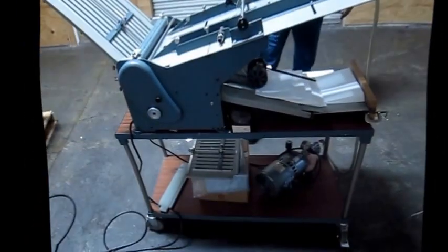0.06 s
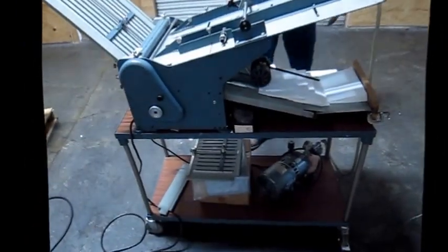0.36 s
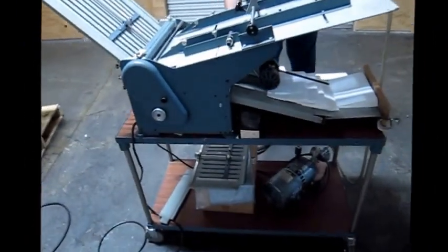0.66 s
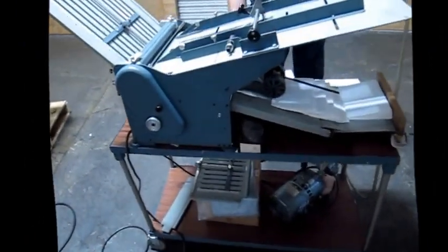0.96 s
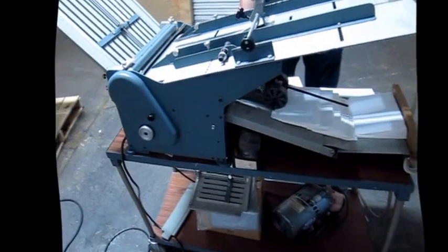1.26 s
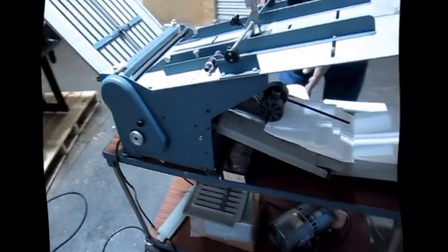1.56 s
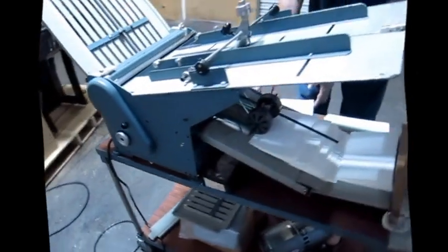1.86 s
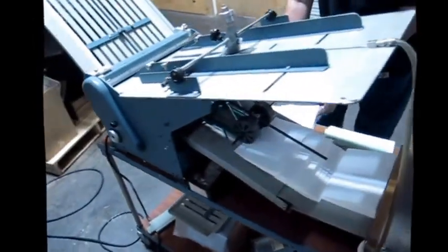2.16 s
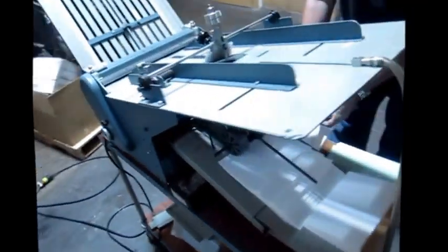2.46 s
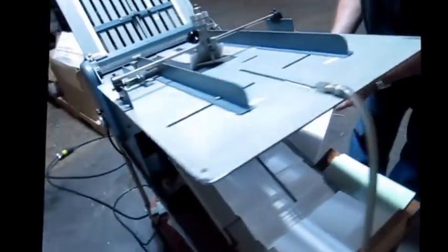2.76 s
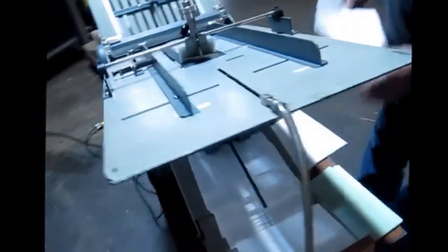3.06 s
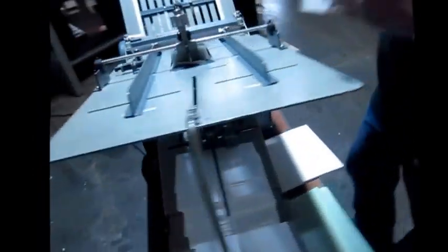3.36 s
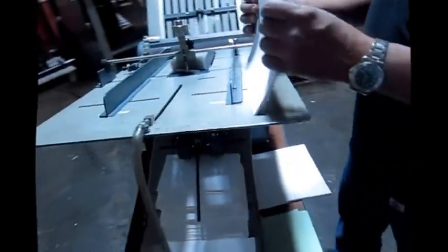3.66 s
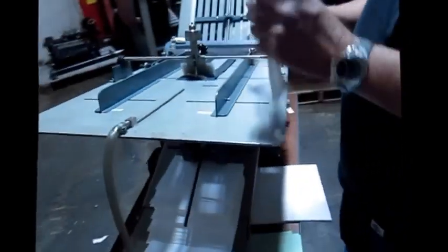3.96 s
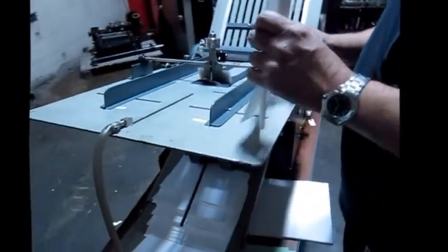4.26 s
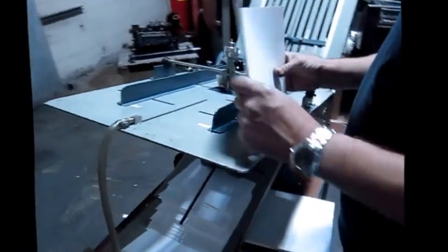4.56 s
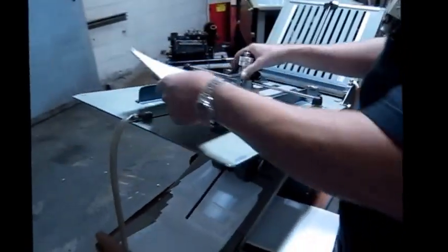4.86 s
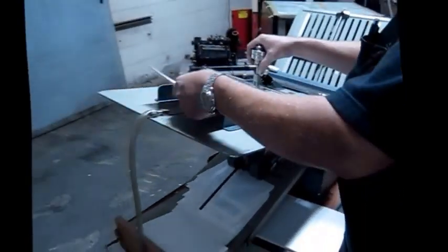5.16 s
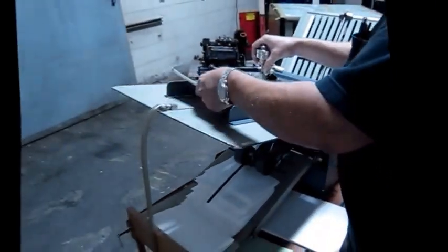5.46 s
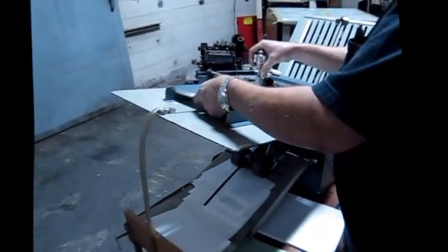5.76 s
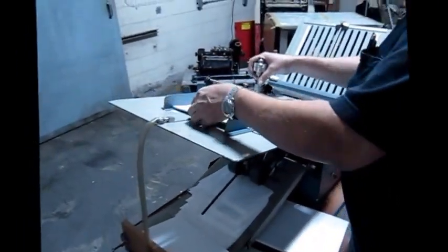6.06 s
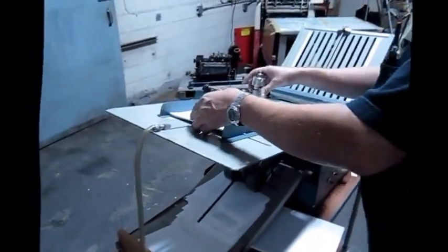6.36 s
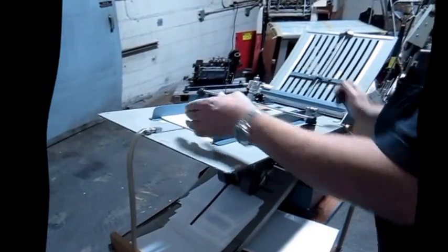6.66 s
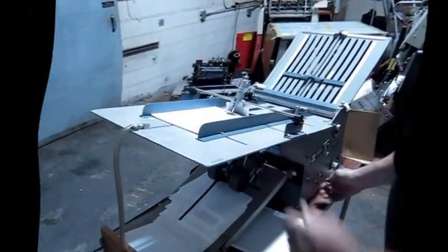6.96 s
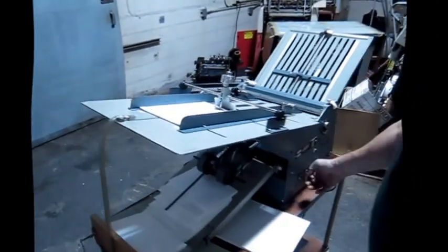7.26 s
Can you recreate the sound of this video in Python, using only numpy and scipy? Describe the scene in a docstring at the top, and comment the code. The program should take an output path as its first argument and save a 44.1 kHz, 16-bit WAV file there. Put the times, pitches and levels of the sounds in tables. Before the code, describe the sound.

A paper folding machine's loud air feed dies away, then paper is knocked on a table and slid into place over a motor hum.

```python
"""A paper folding machine's air feed rushes, whines and squeals as a vane pump drives air through
its nozzles, then dies away over the hum of motor and belts. Close to the microphone a stack of paper
is flexed, knocked square on the feed table and slid into place; the knocks ring on in an echoing
print shop. Valves then let the air hiss in again, and the hum grows as the microphone comes closer."""
import sys
import numpy as np
from scipy import signal
from scipy.fft import rfft, irfft, next_fast_len
from scipy.io import wavfile
from scipy.ndimage import uniform_filter1d, map_coordinates

SR = 44100
rng = np.random.default_rng(int(sys.argv[2]) if len(sys.argv) > 2 else 0)


def unload_audio(sound):
    """Save the sound as a 16-bit wav file, at the path given as the first command line argument."""
    columns = np.transpose(np.atleast_2d(sound))
    # keep every value between -1 and 1, then stretch to whole-number steps
    steps = np.round(np.clip(columns, -1, 1) * 32767)
    wavfile.write(sys.argv[1], SR, steps.astype(np.int16))


N = 322812

# Colours of the moving air. Each row: frequency in Hz, relative level in dB.
ROAR_COLOUR = [(53, -64), (90, -44), (108, -12.5), (215, -8), (275, 3), (321, -3.5), (456, -1.5), (499, -2),
               (580, -0.5), (708, 2), (860, -1), (1520, 0.5), (1730, -1.5), (2000, 0), (2600, -56),
               (4400, -120)]  # the pump's low body
NOZZLE_COLOUR = [(1000, -52.5), (1700, -19), (2000, -8), (2170, -7), (2520, -3), (2840, -4.5), (3150, -3),
                 (3700, -7), (4460, -5), (5600, -13), (6380, -11), (7350, -18.5), (8000, -35), (10400, -48),
                 (17600, -120)]  # the bright stream
HISS_COLOUR = [(4940, -30), (8400, -8), (8900, -3.5), (11100, 1), (13000, -6.5), (14300, -10), (15800, -21)]  # fine sizzle, also the paper's fizz
JET_COLOUR = [(350, -34), (600, -23), (760, -2), (1200, -8.5), (1980, -7), (2450, -9.5), (5590, -8.5),
              (6580, -10.5), (8000, -25), (10400, -51), (17600, -120)]  # the returning air
JET_HISS_COLOUR = [(3500, -30), (5000, -10), (8800, -9), (10000, -1), (11100, 1.5), (12500, -6),
                   (14300, -15), (15800, -26)]  # its airy top
# The pump's whine. Each row: multiple of the vane rate, relative level in dB.
VANE_HARMONICS = [(2, -9), (3, -9), (5, -1), (17, -11), (22, -10)]
# The air pipe's resonances. Each row: centre in Hz, width in Hz, relative level in dB.
PIPE_MODES = [(2580, 220, -11.5), (3070, 130, -20), (4080, 160, -21)]
# Bursts of edge tone at the nozzle. Each row: start in seconds, length in seconds, pitch in Hz,
# glide in Hz per second, tone level in dB, octave level in dB.
SQUEALS = [(0.37, 0.14, 1560, -280, -30.5, -22.5), (0.47, 0.16, 1546, -170, -30, -25.5),
           (0.585, 0.13, 1533, 320, -25.5, -23), (0.69, 0.16, 1562, -50, -32, -28),
           (0.95, 0.09, 1538, 130, -25, -22), (1.01, 0.13, 1556, -110, -29.5, -25)]
# Where the feed sits in stereo. Each row: frequency in Hz, left over right in dB.
FEED_BALANCE = [(60, -6), (150, 1.5), (380, -0.5), (950, 0), (2380, -2), (5980, 2), (15000, -1)]
# Air returning to the nozzles. Each row: valve opening in seconds, closing in seconds, level in dB.
JET_PUFFS = [(6.365, 6.586, -33), (7.074, 7.3, -49.5), (7.248, 7.4, -43)]

# The stack snaps taut or hits the table. Each row: start in seconds, flex level in dB, flex pitch in Hz,
# flex t60 in seconds, slap level in dB, slap low cut in Hz, slap high cut in Hz, thud level in dB,
# crack level in dB, left over right in dB, room send in dB.
KNOCKS = [(2.9985, -13, 1045, 0.031, -22, 900, 1340, -54, -70, 1, -19),
          (3.0026, -24, 2840, 0.0076, -20.5, 1700, 2820, -42, -70, -2, -16),
          (3.6683, 6.5, 2200, 0.003, -8, 250, 3070, -11, 1.5, 1, -24),
          (3.6701, 0.5, 2630, 0.0088, -23, 700, 1100, -34, -20, -1, -17),
          (4.2541, -2.5, 2200, 0.0081, -16.5, 1500, 4900, -29, -27, -5.5, -18),
          (4.2622, -14, 4400, 0.008, -16, 700, 5200, -26, -31, 1, -13),
          (4.4802, -17, 3090, 0.018, -15, 1600, 5050, -23, -35, -1, -16),
          (4.5021, -3, 1830, 0.018, -7.5, 300, 4630, -8, -20, -2.5, -18)]
# Sheets clapping together. Each row: frequency in Hz, relative level in dB.
SLAP_COLOUR = [(300, -4.5), (750, 1.5), (1200, -1.5), (2200, 4), (3200, 0.5), (5000, -2), (7500, -2),
               (16000, -44)]
# The stack's low thud. Each row: pitch in Hz, relative level in dB, t60 in seconds.
STACK_MODES = [(297, -19.5, 0.087), (440, -14.5, 0.065), (657, -7.5, 0.036), (900, -6, 0.0077)]
# Notes left hanging by the knocks. Each row: start in seconds, opening level in dB, centre in Hz,
# width in Hz, t60 in seconds.
HANGING_NOTES = [(3.003, -41, 940, 300, 1.0), (3.004, -46, 2500, 1300, .7), (3.672, -45, 780, 380, 1.1),
                 (4.257, -40, 2120, 160, 1.2), (4.505, -35, 360, 280, .9), (4.56, -34.5, 660, 50, 1.05)]
# Paper rubbing. Each row: frequency in Hz, relative level in dB.
RUB_COLOUR = [(800, -26), (2000, 2), (3800, 2), (5200, -1), (7500, -8.5), (8500, -59)]
# The stack slides in the hands and over the table. Each row: start in seconds, length in seconds,
# relative rub level in dB, relative fizz level in dB.
SLIDES = [(3.19, 0.12, -51.5, -65), (3.325, 0.25, -49.5, -62), (3.576, 0.076, -42, -54),
          (3.634, 0.061, -37, -47), (3.87, 0.12, -45.5, -60), (4.237, 0.096, -51, -49),
          (4.47, 0.18, -39, -52), (4.757, 0.086, -52, -62), (5.145, 0.19, -48.5, -62),
          (5.4, 0.21, -49.5, -55.5), (5.918, 0.071, -54, -56), (6.02, 0.5, -62, -59),
          (6.185, 0.32, -43.5, -54)]
# Sheets brushing, and at 3.654 s a brief low-mid puff of noise just before the loudest knock.
# Each row: start in seconds, level in dB, length in seconds, centre in Hz, width in Hz.
SWISHES = [(2.921, -39.5, 0.056, 2000, 2600), (3.337, -39, 0.055, 1810, 2000),
           (3.583, -38, 0.023, 3870, 3570), (3.647, -29, 0.042, 2820, 4160),
           (3.654, -28.5, 0.011, 670, 500), (4.246, -22.5, 0.017, 3380, 4400),
           (4.4756, -34, 0.025, 2880, 3700), (4.896, -37, 0.016, 2860, 2500),
           (6.233, -37.5, 0.084, 700, 234), (6.747, -35.5, 0.056, 4500, 3200),
           (6.772, -28.5, 0.07, 3700, 2500)]
# Light ticks of paper and fittings. Each row: start in seconds, peak in dB, centre in Hz.
TICKS = [(2.422, -31, 4370), (2.4328, -21, 5200), (2.4335, -25, 2700), (2.645, -34, 2730),
         (2.9225, -30, 2680), (2.95, -35, 3700), (3.352, -36, 4560), (3.473, -28, 4460), (3.584, -27, 4000),
         (3.914, -28, 3800), (4.128, -29.5, 4000), (4.531, -19, 2300), (4.899, -28, 3800),
         (5.003, -29.5, 4460), (5.193, -32, 12400), (5.5413, -33, 4000), (6.2347, -34, 4300)]
# Soft low bumps. Each row: start in seconds, relative level in dB, pitch in Hz.
BUMPS = [(1.268, -27, 150), (2.514, -31, 106), (2.925, -26, 135), (3.582, -27, 140), (3.666, -27.5, 70),
         (3.668, -22, 270)]

# The drive's fader ride as the microphone nears. Each row: time in seconds, relative level in dB.
DRIVE_RIDE = [(0, -63), (2.05, -49.5), (2.9, -45), (3.5, -42), (4.3, -44), (5.1, -43), (5.9, -41.5),
              (6.85, -37), (7.1, -36.5), (7.32, -35)]
# Steady hums. Each row: pitch in Hz, relative level in dB.
MOTOR_TONES = [(118.4, -53), (177.6, -49), (274.5, -53.5), (355, -59), (413.2, -59.5), (532, -62),
               (549.3, -53), (592.2, -58), (721.4, -55), (1082, -62)]  # motor and belts
MAINS_TONES = [(120, -65)]  # a steady mains hum
# Colours of the machinery. Each row: frequency in Hz, relative level in dB.
ROLLER_COLOUR = [(12, -47), (20, -23), (60, -17), (113, -9), (145, -3), (173, -19), (206, -1.5),
                 (239, -0.5), (348, 0.5), (495, -6.5), (547, -4.5), (1220, -12), (1610, -11.5),
                 (4970, -21.5), (8000, -33), (10400, -54), (17600, -120)]  # rollers and bearings
STAND_COLOUR = [(20, -10), (45, -4), (66, -5), (85, -3), (115, -3), (200, -4), (400, -40)]  # the trembling stand
# The low drones and rumble swell and fade; the low end drops sharply just after the loudest knock. # Each row:
# time in seconds, pulley drone in dB, cabinet drone in dB, rumble in dB.
BASS_RIDE = [(0, -65, -60, -69), (1.3, -66, -53.5, -62), (2.1, -62, -60, -60), (2.9, -64, -54, -61),
             (3.55, -52, -53, -51.5), (3.8, -57, -66, -65), (4.4, -53.5, -62, -58), (6.0, -51.5, -59, -54),
             (7.32, -52, -51, -45.5)]

# Stereo width. Each row: frequency in Hz, left-right likeness (1 is mono).
FEED_IMAGE = [(60, 0.98), (150, 1), (380, 0.98), (950, 0.93), (2380, 0.43), (5980, 0.14), (15000, -0.2)]
WIDE_IMAGE = [(60, 0.9), (150, 1), (380, 0.95), (950, 0.88), (2380, 0.32), (5980, 0.02), (15000, 0.06)]
# The shop's decay. Each row: frequency in Hz, t60 in seconds.
SHOP_DECAY = [(150, 1.47), (600, 2.23), (2000, 1.9), (4000, 1.97), (7000, 0.46), (12000, 0.3)]
# The tone of its echo. Each row: frequency in Hz, relative level in dB.
SHOP_COLOUR = [(100, 5), (400, -3.5), (750, 5), (1300, 5.5), (2300, 0), (4000, -5), (12000, 5)]

VANE_HZ, SHAFT_HZ, PULLEY_HZ, CABINET_HZ = 233.63, 59, 70, 107.5
NOZZLES_OPEN_S, OPENING_S, FEED_CUT_S = 0.24, 0.17, 1.24
DULL_HZ, DULLING_DB_PER_S = 4100, 25
STACK_HELD_FROM_S = 2.55


def air_feed():
    """The pump roars under the nozzles' rush and hiss; each passing vane pushes one puff of air."""
    vane_phase = turning(VANE_HZ, drift=0.0006)
    pulsing = 1 + 0.09 * np.sin(vane_phase)
    roar = flow(-25.78, shut_db=0.59, fall_db_per_s=38.7) * rush(ROAR_COLOUR, FEED_IMAGE, patchy_db=1)
    hiss = flow(-27, shut_db=3.3, fall_db_per_s=79) * rush(HISS_COLOUR, FEED_IMAGE, patchy_db=2.5)
    air = nozzle_stream() + pipe_ring() + hiss
    feed = roar + pump_whine(vane_phase) + squeals() + pulsing * air
    return filtered(feed, lambda hz: amp(along(FEED_BALANCE, hz) * np.array([[0.5], [-0.5]])))


def nozzle_stream():
    """Air tears through the nozzles and loses its top first as the pressure falls."""
    stream = rush(NOZZLE_COLOUR, FEED_IMAGE, patchy_db=1.2)
    dull = filtered(stream, lambda hz: 1 / (1 + (hz / DULL_HZ) ** 6))
    top = (stream - dull) * amp(-DULLING_DB_PER_S * after(FEED_CUT_S))
    return flow(-18.5, shut_db=6.1, fall_db_per_s=42.2) * (dull + top)


def pipe_ring():
    """Eddies ring the air pipe, which flares up briefly before the cut-off."""
    eddies = spread(rng.standard_normal((2, N)), FEED_IMAGE)
    ring = sum(amp(db + 1.7 * wobble(7.3)) * unit(band_pass(eddies, hz, width, stages=1))
               for hz, width, db in PIPE_MODES)
    flare = amp(6.1 * swell(start=0.903, length=0.14))
    return flow(-18, shut_db=22, fall_db_per_s=50) * flare * ring


def pump_whine(vane_phase):
    """Vanes passing the port sing in harmonics; the second swells while the nozzles are wide open."""
    harmonics = sum(amp(db + 2.2 * wobble(17.3)) * np.sin(k * vane_phase + rng.normal(0, 0.19, (2, 1)))
                    for k, db in VANE_HARMONICS)
    drone = amp(-35) * swell(start=0.65, length=0.59) * np.sin(2 * vane_phase)
    return flow(-35, shut_db=0.35, fall_db_per_s=110) * harmonics + drone


def squeals():
    """The nozzle's edge tone catches in gliding, fluttering bursts, each with its octave."""
    out = np.zeros((2, N))
    for start, length, hz, glide, tone_db, octave_db in SQUEALS:
        pitch = hz + glide * np.clip(seconds() - start, 0, length)
        phase = 2 * np.pi * np.cumsum(pitch * (1 + 0.007 * wobble(140))) / SR
        out += swell(start, length) * (amp(tone_db) * np.sin(phase) + amp(octave_db) * np.sin(2 * phase))
    flutter_db = 2.5 * wobble(70) + 2 * np.array([wobble(60), wobble(60)])
    return out * unit(amp(flutter_db))


def flow(full_db, shut_db, fall_db_per_s):
    """A feed layer's envelope: up by shut_db as the nozzles open, bleeding away after the cut-off."""
    shut = 1 - np.clip((seconds() - NOZZLES_OPEN_S) / OPENING_S, 0, 1)
    return amp(full_db - shut_db * shut - fall_db_per_s * after(FEED_CUT_S))


def air_jet():
    """A valve blows a thin jet at the stack's edge; its fine hiss cracks on early and dies first."""
    jet, hiss = np.zeros((2, N))
    for start, stop, db in JET_PUFFS:
        open_s = np.maximum(seconds() - start, 0)
        jet += (1 - np.exp(-open_s / 0.044)) * amp(db - 34.5 * after(stop))
        hiss += (1 - np.exp(-open_s / 0.045)) ** 0.2 * amp(db - 1 - 55 * after(stop))
    return (jet * rush(JET_COLOUR, WIDE_IMAGE, patchy_db=2)
            + hiss * rush(JET_HISS_COLOUR, FEED_IMAGE, patchy_db=0))


def stack_knocks():
    """Each blow flexes, thuds, slaps and cracks. Returns dry hits, scatter off the machine, room send."""
    direct, scattered, send = np.zeros((3, 2, N))
    t = np.arange(SR // 6) / SR
    for start, flex_db, hz, t60, slap_db, low_hz, top_hz, thud_db, crack_db, pan_db, room_db in KNOCKS:
        onset = 1 - np.exp(-(t * hz / 0.53) ** 2)  # a slow flip starts softly
        phase = 2 * np.pi * hz * t
        flex = amp(flex_db - 60 * t / t60) * (np.sin(phase) + amp(-8.5) * np.sin(1.3 * phase))
        thud = sum(amp(thud_db + db - 60 * t / mode_t60) * np.sin(2 * np.pi * mode_hz * t)
                   for mode_hz, db, mode_t60 in STACK_MODES)
        burst = amp(crack_db - 60 * t / 0.0017) * rng.standard_normal(len(t))
        crack = band_pass(burst, hz=5400, width=6600, stages=4)
        decay = amp(-60 * t / 0.02) + amp(-17 - 60 * t / 0.11)  # a quick clap and the table's answer
        slap = amp(slap_db) * decay * sheet_noise(len(t), low_hz, top_hz)
        pan = amp([[pan_db / 2], [-pan_db / 2]])
        blow = pan * (onset * (flex + thud + slap) + crack)
        add(direct, start, blow)
        add(send, start, amp(room_db) * blow)
        add(scattered, start, amp(slap_db - 18 - 60 * t / 0.3) * sheet_noise(len(t), low_hz, top_hz))
    return direct, scattered, send


def sheet_noise(samples, low_hz, top_hz):
    """The raw noise of sheets clapping together, centred in the mids and wide on top."""
    noise = spread(rng.standard_normal((2, samples)), [(1000, 0.97), (8000, 0.3)])
    cuts = lambda hz: hz / np.hypot(hz, low_hz) / np.hypot(1, (hz / top_hz) ** 6)
    return unit(filtered(noise, lambda hz: amp(along(SLAP_COLOUR, hz)) * cuts(hz)))


def rustle():
    """Paper rubs in tiny catches: faintly while the stack is held, louder with each slide."""
    held = (seconds() > STACK_HELD_FROM_S) * amp(2.9 * wobble(6.35))
    rub_gain, fizz_gain = held * amp(-58), held * amp(-71)
    for start, length, rub_db, fizz_db in SLIDES:
        slide = swell(start, length)
        rub_gain = np.hypot(rub_gain, amp(rub_db) * slide)
        fizz_gain = np.hypot(fizz_gain, amp(fizz_db) * slide)
    catches = unit(amp(2.5 * wobble(250) + 2.1 * wobble(30)))
    rub = rub_gain * amp(0.5) * rush(RUB_COLOUR, WIDE_IMAGE, patchy_db=-0.5)
    fizz = fizz_gain * amp(3) * rush(HISS_COLOUR, WIDE_IMAGE, patchy_db=-2)
    return catches * (rub + fizz)


def swishes():
    """Quick-rising strokes of noise: sheets brushing, and one low-mid puff before the loudest knock."""
    out = np.zeros((2, N))
    for start, db, length, hz, width in SWISHES:
        progress = np.linspace(0, 1, int(length * SR))
        stroke = np.abs(np.sin(np.pi * progress ** 0.42)) ** 0.8
        grains = spread(rng.standard_normal((2, len(stroke))), [(1000, 0.54)])
        add(out, start, amp(db) * stroke * unit(band_pass(grains, hz, width)))
    return out


def small_contacts():
    """Paper and fittings touch in dry ticks and soft low bumps."""
    out, t = np.zeros((2, N)), np.arange(SR // 10) / SR
    for start, db, hz in TICKS:
        burst = spread(rng.standard_normal((2, len(t))), [(1000, 0.14)]) * amp(-60 * t / 0.011)
        tick = band_pass(burst, hz, width=3600)
        add(out, start, amp(db) * tick / np.abs(tick).max())
    bump_shape = t / 0.011 * np.exp(1 - t / 0.0046)
    for start, db, hz in BUMPS:
        add(out, start, amp(db) * bump_shape * np.sin(2 * np.pi * hz * t))
    return out


def drive():
    """Motor and belts hum over roller noise that throbs once a turn and shudders as the air is cut."""
    level_db = np.interp(seconds(), *np.transpose(DRIVE_RIDE))
    motor_gain = amp(-5.5 + 1.36 * (level_db + 44))  # the hum grows faster than the roller noise
    shudder = amp(-41) * swell(start=1.16, length=0.47)
    throb = 1 + 0.11 * np.sin(turning(SHAFT_HZ, drift=0.0011))
    rollers = amp(-0.5) * throb * rush(ROLLER_COLOUR, WIDE_IMAGE, patchy_db=1.6)
    return motor_gain * hum(MOTOR_TONES) + (amp(level_db) + shudder) * rollers


def stand():
    """The drive shakes the stand into two low drones and a rumble."""
    times, *levels = np.transpose(BASS_RIDE)
    pulley_db, cabinet_db, rumble_db = (np.interp(seconds(), times, db) for db in levels)
    rumble = amp(rumble_db) * rush(STAND_COLOUR, [(30, 0.54), (100, 0.78)], patchy_db=-1.5)
    return hum([(PULLEY_HZ, pulley_db), (CABINET_HZ, cabinet_db)]) + rumble


def hum(tones):
    """Tones of turning parts, each wandering in pitch and fluttering in level."""
    out = np.zeros(N)
    for hz, db in tones:
        flutter = unit(amp(2.3 * wobble(8) + 3 * wobble(40)))
        out += amp(db) * flutter * np.sqrt(2) * np.sin(turning(hz, drift=0.0025))
    return out


def hanging_notes():
    """After the knocks, narrow bands ring on in the table and the shop."""
    out, t = np.zeros((2, N)), np.arange(SR) / SR
    for start, db, hz, width, t60 in HANGING_NOTES:
        noise = spread(rng.standard_normal((2, len(t))), WIDE_IMAGE)
        add(out, start, amp(db - 60 * t / t60) * unit(band_pass(noise, hz, width)))
    return out


def shop_echo(send):
    """The hard-walled room rings long in the mids and swallows the treble."""
    hz, t, bins = signal.stft(rng.standard_normal((2, 3 * SR // 2)), SR, nperseg=256)
    decay_db = along(SHOP_COLOUR, hz)[:, None] - 60 * t / along(SHOP_DECAY, hz)[:, None]
    tail = signal.istft(bins * amp(decay_db), SR, nperseg=256)[1]
    fade_in = 1 - np.exp(-np.arange(tail.shape[1]) / SR / 0.0011)
    tail = spread(tail, WIDE_IMAGE) * fade_in
    return signal.fftconvolve(send.mean(axis=0)[None], tail / np.linalg.norm(tail[0]), axes=1)[:, :N]


def room_tone():
    """The air line hisses faintly under everything over a steady mains hum."""
    return amp(-70) * rush(HISS_COLOUR, WIDE_IMAGE, patchy_db=4.5) + hum(MAINS_TONES)


def rush(colour, image, patchy_db):
    """Turbulent stereo noise of rms 1, mottled in time and frequency by patchy_db."""
    bins = signal.stft(rng.standard_normal((2, N)), nperseg=512)[2]
    patches = uniform_filter1d(rng.standard_normal(bins.shape[1:]), size=5, axis=0)
    patches = unit(uniform_filter1d(patches, size=10, axis=1))
    pair = signal.istft(bins * amp(patchy_db * patches), nperseg=512)[1][:, :N]
    return unit(filtered(spread(pair, image), lambda hz: amp(along(colour, hz))))


def spread(pair, image):
    """Two unrelated signals become left and right with the given likeness."""
    angle = lambda hz: np.arccos(np.clip(along(image, hz), -1, 1)) / 2
    mid, side = filtered(pair, lambda hz: np.array([np.cos(angle(hz)), np.sin(angle(hz))]))
    return np.array([mid + side, mid - side])


def band_pass(x, hz, width, stages=2):
    """Ring x through a chain of like resonances, each width Hz wide."""
    return filtered(x, lambda f: (1j * f * width / (hz * hz - f * f + 1j * f * width)) ** stages)


def filtered(x, response):
    """EQ x with a gain given as a function of Hz."""
    n = x.shape[-1]
    padded = next_fast_len(n + SR // 4)
    return irfft(rfft(x, padded) * response(np.fft.rfftfreq(padded, 1 / SR)), padded)[..., :n]


def along(points, hz):
    """Read a curve of (Hz, value) points on a log axis."""
    freqs, values = np.transpose(points)
    return np.interp(np.log(hz + 1), np.log(freqs + 1), values)


def turning(hz, drift):
    """Phase of a shaft whose speed wanders a little."""
    return 2 * np.pi * (np.cumsum(hz * (1 + drift * wobble(5))) / SR + rng.random())


def wobble(rate):
    """A smooth random curve, rate knots a second."""
    return map_coordinates(rng.standard_normal(int(N * rate / SR) + 4), [np.arange(N) * rate / SR])


def swell(start, length):
    """A stroke that rises quickly and eases off; times in seconds."""
    progress = np.clip((seconds() - start) / length, 0, 1)
    return np.abs(np.sin(np.pi * progress ** 0.54))


def after(start, ease_s=0.054):
    """Seconds gone by since start, setting in smoothly."""
    return ease_s * np.logaddexp(0, (seconds() - start) / ease_s)


def add(track, start, sound):
    """Mix a sound in at start seconds."""
    part = track[..., round(start * SR):][..., :sound.shape[-1]]
    part += sound[..., :part.shape[-1]]


def seconds():
    return np.arange(N) / SR


def amp(db):
    return 10 ** (np.asarray(db) / 20)


def unit(x):
    return x / np.sqrt(np.mean(x ** 2) + 1e-20)


def scene():
    """The machine plays dry; the paper is up close, and what scatters off it fills the shop."""
    machine = air_feed() + air_jet() + drive() + stand()
    knocks, scattered, send = stack_knocks()
    handling = rustle() + swishes() + small_contacts()
    echo = shop_echo(send + scattered + amp(-5.5) * handling)
    return machine + knocks + scattered + handling + hanging_notes() + echo + room_tone()


def record(dry):
    """The loudest knock clips; a narrow treble notch is cut and the highest treble is removed."""
    clipped = np.clip(dry, -1, 1)
    notch = lambda hz: 1 - 0.98 * np.exp(-((hz - 8230) / 340) ** 4)
    return filtered(clipped, lambda hz: notch(hz) * (hz < 15800))


dry = scene()
out = record(dry)
unload_audio(out)
```